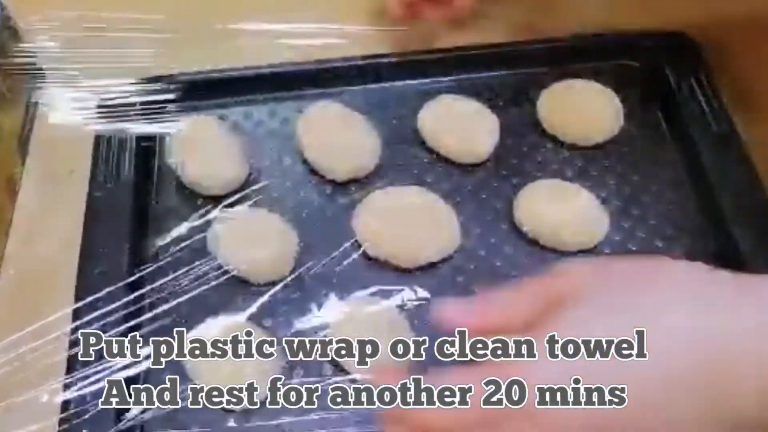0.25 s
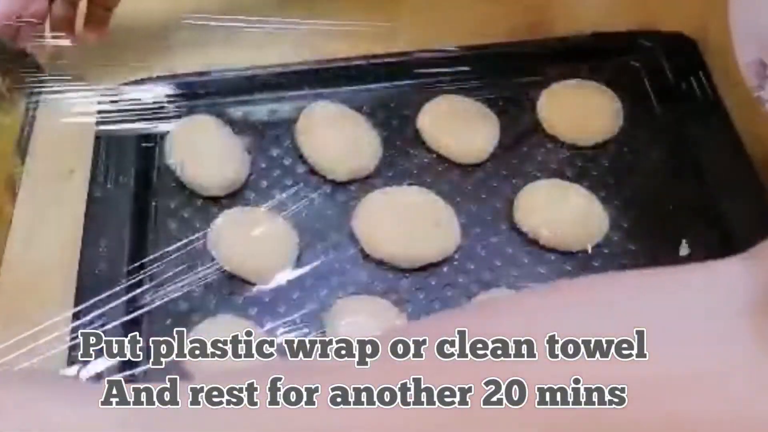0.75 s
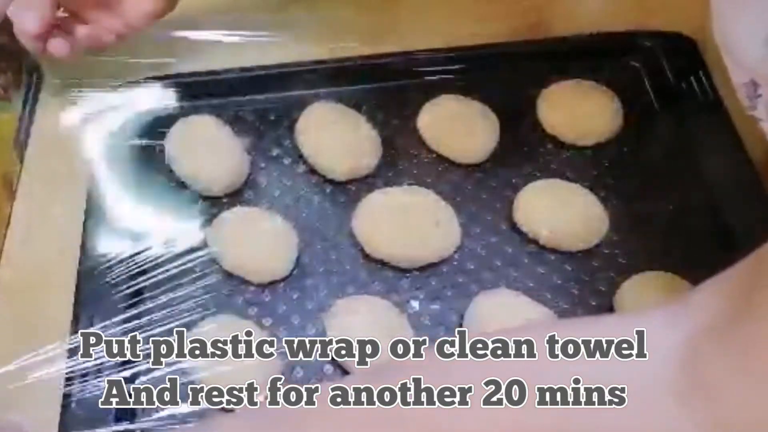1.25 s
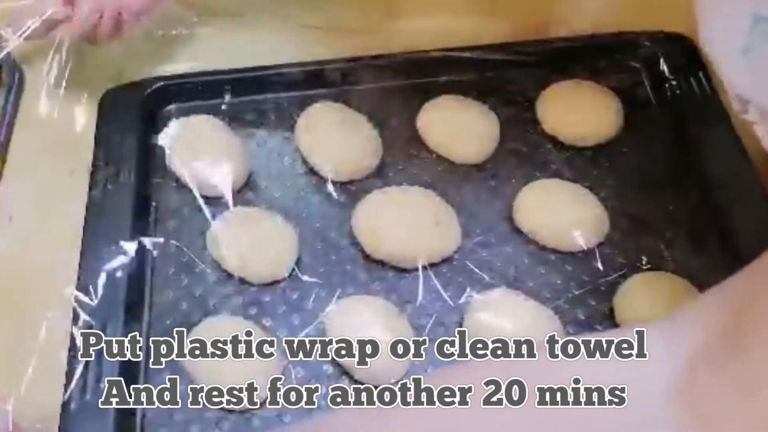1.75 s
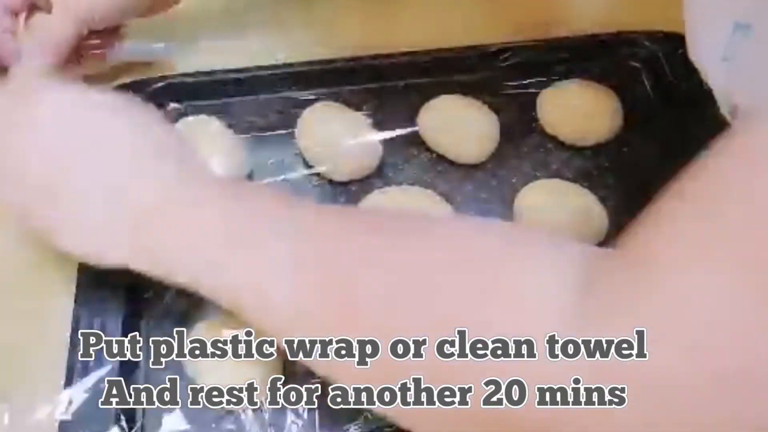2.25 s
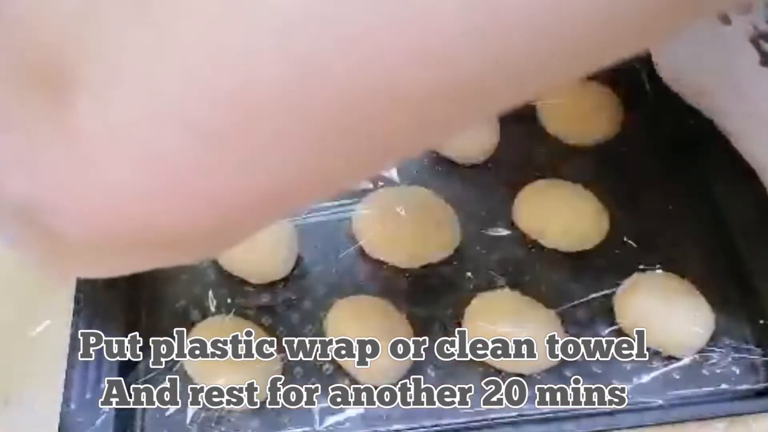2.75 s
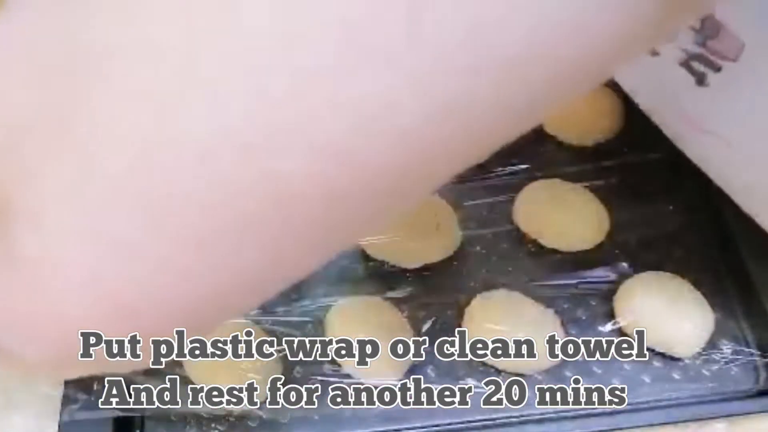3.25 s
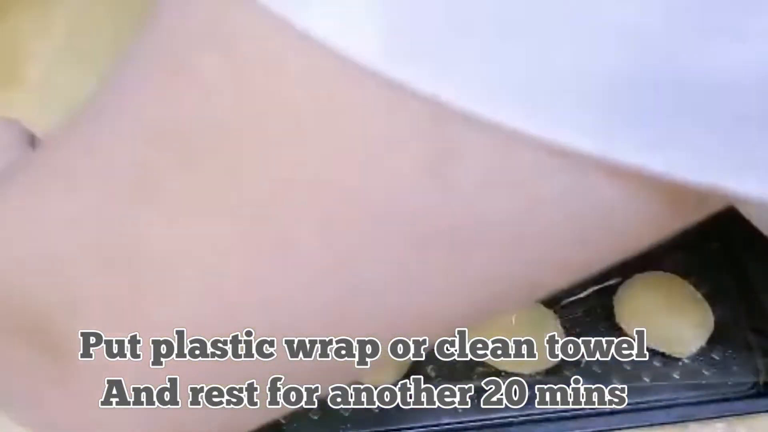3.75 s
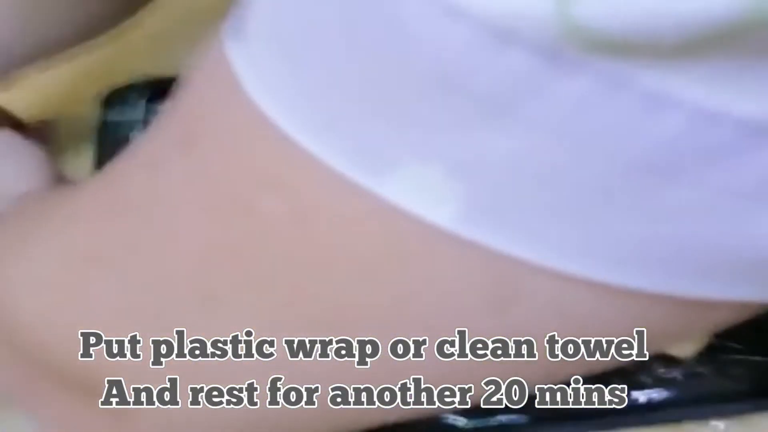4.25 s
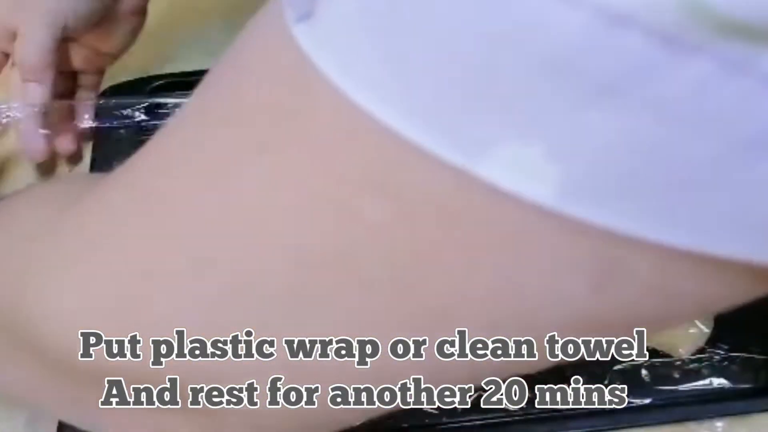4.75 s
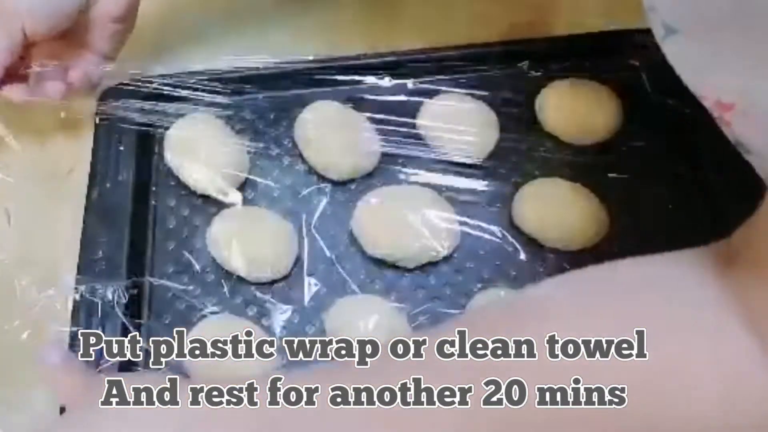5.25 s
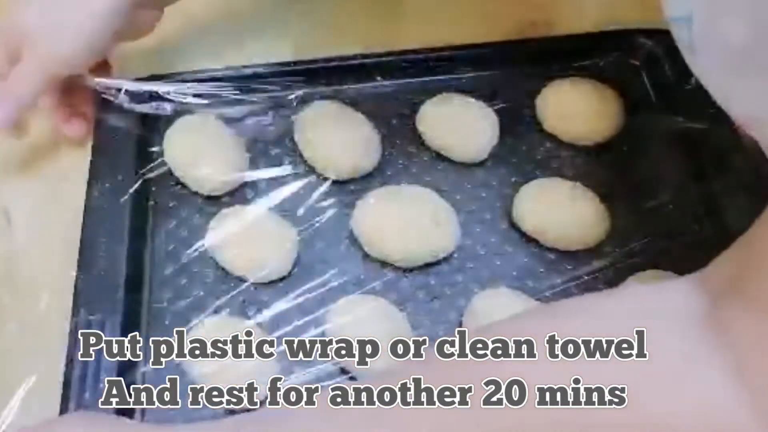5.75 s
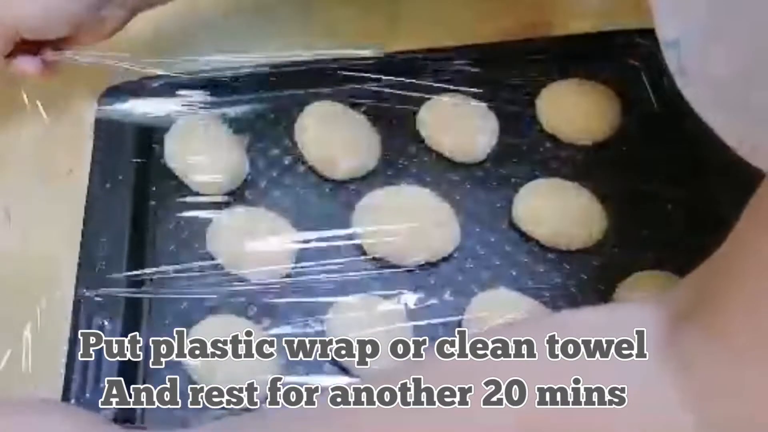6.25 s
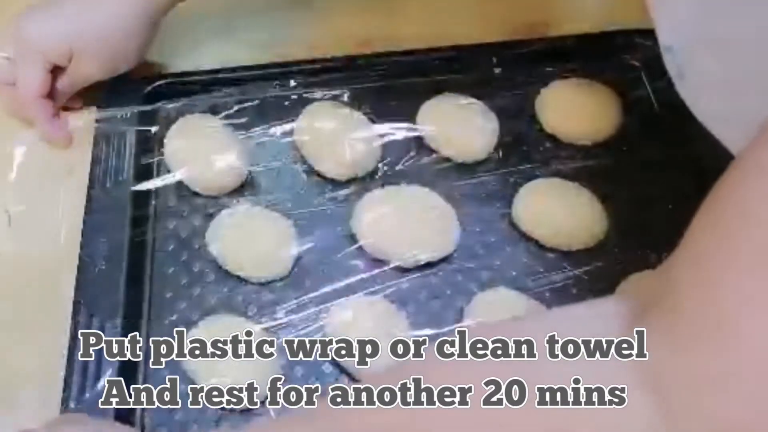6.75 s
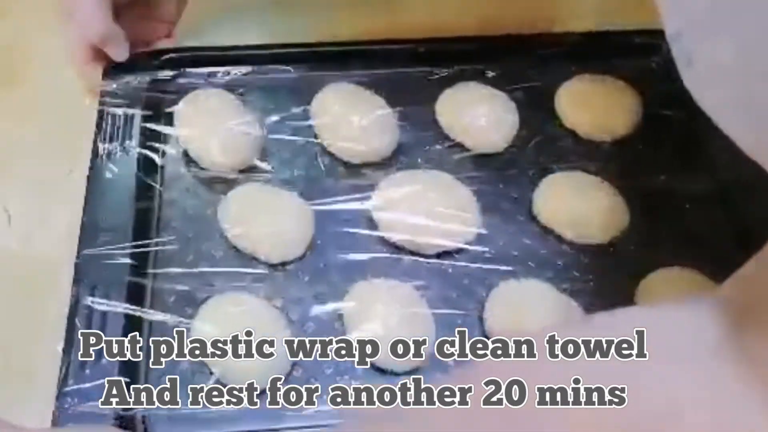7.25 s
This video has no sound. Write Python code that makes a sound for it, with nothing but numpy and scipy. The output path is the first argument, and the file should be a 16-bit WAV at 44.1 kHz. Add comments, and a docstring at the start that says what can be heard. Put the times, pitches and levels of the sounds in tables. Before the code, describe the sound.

Plastic wrap crackles in uneven pulls close to the microphone, with thin squeaks and crisp snaps, as it is drawn over a metal tray. The tray slides briefly and bumps on a wooden counter. The crackling grows busier, then two heavy thumps shake the counter and rattle the tray, and softer crinkling follows. An appliance hums low throughout in the small, slightly echoing kitchen.

```python
"""An appliance hums throughout in a small, hard-walled kitchen. From the start, cling film is pulled over
a metal tray of dough close to the microphone: it crinkles as it buckles, then squeaks softly by stick-slip
and snaps at single creases. The tray scrapes on the wooden counter and, from 1.5 s, is lightly knocked.
At 4.1 s and 4.3 s two heavy thumps set the counter ringing and the tray bouncing and clattering.
Crinkles, squeaks, snaps and a few scrapes and knocks go on to the end."""
import sys
import numpy as np
from scipy import signal
from scipy.fft import rfft, irfft
from scipy.io import wavfile

SR = 44100
rng = np.random.default_rng(int(sys.argv[2]) if len(sys.argv) > 2 else 0)


def waveform_to_disk(signal):
    """Save audio, clipped to [-1, 1], as 16-bit WAV at the path in sys.argv[1]."""
    frames = np.transpose(np.atleast_2d(signal))
    scaled = np.clip(frames, -1, 1) * 32767
    samples = np.round(scaled).astype(np.int16)
    wavfile.write(sys.argv[1], SR, samples)


N = 331146
T = np.arange(N) / SR


def amp(db):
    """Amplitude ratio of a level in decibels."""
    return 10 ** (np.asarray(db) / 20)


def unit(x):
    """Normalisation to rms 1."""
    return x / np.sqrt(np.mean(x ** 2) + 1e-20)


def read(points, hz):
    """Interpolation of a table over log frequency."""
    f, value = np.transpose(points)
    return np.interp(np.log(hz + 1), np.log(f + 1), value)


def add(mix, s, sound):
    """Superposition: a sound joins the mix at s seconds."""
    part = mix[max(round(s * SR), 0):][:len(sound)]
    part += sound[:len(part)]


def colour(x, spectrum, tilt_db=0, size=4096):
    """Minimum-phase filtering at energy 1, with the spectrum tilted by tilt_db per octave."""
    hz = abs(np.fft.fftfreq(size, 1 / SR))
    gain = amp(read(spectrum, hz) + tilt_db * np.log2(np.maximum(hz, 100) / 1000))
    log_gain = np.log(np.maximum(gain / gain.max(), 1e-5))
    response = np.fft.ifft(np.exp(np.conj(signal.hilbert(log_gain)))).real[:size // 2]
    return signal.oaconvolve(x, response / np.linalg.norm(response))[:len(x)]


def drift(rate_hz):
    """Low-pass Gaussian noise: a random fluctuation of rms 1."""
    hz = np.fft.rfftfreq(N, 1 / SR)
    return unit(irfft(rfft(rng.standard_normal(N)) * np.exp(-(hz / rate_hz) ** 2), N))


def clicks(count, per_s, spread_db):
    """A Poisson process of impulses, many small and a few large."""
    size = amp(spread_db * np.minimum(rng.exponential(1, count), 3.5))
    return size * rng.choice([-1, 1], count) * (rng.random(count) < per_s / SR)


def burst(decay_s, count=2048):
    """Exponential decay of noise that starts near rms 1."""
    fade = np.exp(-T[:count] / decay_s)
    puff = rng.standard_normal(count) * fade
    return puff * np.linalg.norm(fade) / np.linalg.norm(puff)


def flick(smear_s, count=1024):
    """Dispersion of bending waves spreads a click of energy 1: the treble arrives first."""
    hz = np.fft.rfftfreq(count, 1 / SR)
    delay = smear_s * (1 - hz / hz[-1]) ** 2 + 8 / SR
    return irfft(np.exp(-2j * np.pi * np.cumsum(delay) * hz[1]), count)


# Partials of the motor: f/Hz, level/dB
MOTOR_PARTIALS = [(43, -66.5), (104, -55), (147, -64.5), (208.8, -59), (246, -64), (418, -71.5),
                  (522.5, -63), (627, -77.5), (731, -73.5), (836, -72.5), (941, -74.5)]
# Spectrum of the room's soft rush: f/Hz, level/dB
RUSH_SPECTRUM = [(13, -20), (22, 7), (70, -6), (97, -4.5), (128, -7), (211, -5), (347, -13.5), (524, -14),
                 (585, -14.5), (1130, -19.5), (1490, -27.5), (2740, -27.5), (3610, -34), (7000, -33.5),
                 (16000, -48)]
# Change in the room noise, partly screened by the cook's body: t/s, level/dB
SCREENING = [(0, 1), (0.7, 1.05), (2.4, 0.67), (3.8, -0.5), (4.8, -1), (6, -1.5), (7.5, -1)]


def appliance(rush_db=-50, waver_db=2, wander=0.00289):
    """Acoustic shadowing: a motor wavers over the room's rush, and its higher tones are screened more."""
    screen_db = np.interp(T, *np.transpose(SCREENING))
    turns = np.cumsum(1 + wander * drift(rate_hz=4.18)) / SR
    hum = np.zeros(N)
    for hz, db in MOTOR_PARTIALS:
        rms = amp(db + waver_db * drift(rate_hz=4.2) + screen_db * min(hz / 220, 2.5))
        hum += rms * np.sqrt(2) * np.sin(2 * np.pi * (hz * turns + rng.random()))
    return hum + amp(rush_db + screen_db) * colour(rng.standard_normal(N), RUSH_SPECTRUM, size=16384)


# Spectrum of the crinkling film: f/Hz, level/dB
FILM_SPECTRUM = [(900, -31), (1500, -13), (2000, -17.5), (2600, -5.5), (3700, -12), (4300, -5.5),
                 (7000, -6), (8700, 0), (11000, -13), (15200, -16.5), (16300, -35)]
# Pulls and presses on the film: t/s, duration/s, relative level/dB, tilt/(dB per octave)
FILM_PULLS = [(0.003, 0.04, -58.5, -1.5), (0.222, .32, -69, -3), (0.74, .1, -52, -5),
              (0.971, 0.35, -61.5, -7.5), (1.309, 0.22, -51.5, -4.5), (1.743, 0.26, -64, -2.5),
              (2.174, 0.065, -61, 0), (2.461, 0.33, -59.5, -7), (2.782, 0.018, -39.5, -3.5),
              (2.799, .15, -43, -2), (2.952, 0.357, -58, 1), (3.252, 0.098, -50, -2),
              (3.336, 0.14, -44.5, 0), (3.481, .16, -49.5, .5), (3.647, 0.027, -40.5, 1.5),
              (4.093, 0.126, -54.5, 3.5), (4.227, 0.15, -45.5, 0), (4.863, 0.083, -55.5, 5),
              (5.302, 0.13, -61, -2), (5.782, 0.287, -57, 1), (6.509, .005, -50, 1),
              (6.66, 0.055, -60.5, 4), (6.773, 0.054, -50.5, 3), (6.914, 0.67, -67, -3.5),
              (7.367, 0.055, -58.5, -4)]


def crinkle(gain_db=-1, relax_db=2, ref_s=0.082, ref_db=-52):
    """Buckling: each pull forms clumps of tiny creases over the friction hiss of film on film."""
    out = np.zeros(N)
    clumps = amp(3 * drift(rate_hz=130))
    for s, length, db, tilt_db in FILM_PULLS:
        count = int(length * SR)
        # Quicker and harder pulls crease more densely; gentler ones have a larger share of hiss.
        per_s = 1050 * (ref_s / length) ** 0.43 * amp(db - ref_db) ** 0.47
        creases = unit(clicks(count, per_s, spread_db=4.5))
        hiss = amp(-4 + 0.29 * (ref_db - db)) * rng.standard_normal(count)
        sheet = unit((creases + hiss) * np.roll(clumps, -int(s * SR))[:count])
        pull = signal.windows.tukey(count, .25) * amp(relax_db * np.linspace(.5, -.5, count))
        add(out, s, amp(db + gain_db) * colour(np.pad(sheet * pull, (0, 2048)), FILM_SPECTRUM, tilt_db))
    return signal.oaconvolve(out, flick(smear_s=0.000762))[:N]


# Short squeaks of the film and a brief bright scrape of the tray: t/s, duration/s, f/Hz, relative level/dB
FRICTION_SQUEAKS = [(0.596, 0.24, 3065, -54), (0.729, .04, 2280, -48), (0.772, 0.02, 8530, -35.5),
                    (1.018, 0.1804, 2830, -57), (1.101, 0.24, 4150, -52), (1.156, 0.19, 6437, -52),
                    (2.774, 0.02, 2590, -34.5), (4.738, .14, 2970, -62), (5.425, 0.23, 4852, -54.5),
                    (5.983, .21, 6100, -58), (5.98, .17, 3134, -62.5), (7.382, .18, 6460, -60),
                    (7.397, 0.15, 3180, -60.5)]


def squeaks(gain_db=-2, glide=0.0495):
    """Irregular stick-slip drives one rising resonance: tightening film squeaks, or the tray scrapes."""
    out = np.zeros(N)
    grip = amp(2.1 * drift(rate_hz=57))  # the surfaces hold and let go unevenly
    for s, length, hz, db in FRICTION_SQUEAKS:
        count = int(length * SR)
        # Higher and briefer squeaks fill a wider band.
        width_hz = min(370 * (hz / 3000) ** 2.34, 1400) * (0.2 / length) ** 0.35
        band = np.exp(-2 * (np.fft.fftfreq(count, 1 / SR) / width_hz) ** 2)
        slips = np.fft.ifft(band * np.exp(2j * np.pi * rng.random(count)))
        turns = np.cumsum(hz * (1 + glide * np.linspace(-.5, .5, count))) / SR
        tone = unit((slips * np.exp(2j * np.pi * turns)).real)
        rasp = unit(np.roll(grip, -int(s * SR))[:count])
        add(out, s, amp(db + gain_db) * tone * rasp * np.hanning(count))
    return out


# Spectra of a snap's body and of its sharp leading edge: f/Hz, level/dB
BODY_SPECTRUM = [(300, -4), (1500, 2), (2600, -3.5), (3600, -5), (5000, -7.5), (9000, -0.5), (10500, -7),
                 (13000, -15.5)]
EDGE_SPECTRUM = [(7000, -33.5), (10500, -2), (13500, -9), (15300, -15), (16200, -21)]
# The loudest creases, which flip singly: t/s, relative level/dB, centre f/Hz, edge level/dB re body
CREASE_FLIPS = [(0.7213, -38, 5150, -4), (1.077, -48, 2870, -5), (1.312, -35.5, 3550, -19),
                (1.3456, -31, 6870, -7), (1.4899, -27, 6150, -6.5), (1.546, -29, 3130, -11),
                (1.8795, -47, 6660, -26), (2.6888, -40.5, 8850, -12.5), (2.7378, -30, 9080, -2),
                (2.7685, -30, 2640, -4), (2.805, -26.5, 6740, -13), (2.8127, -22.5, 9260, -14),
                (3.0702, -31, 8750, -9), (3.2495, -32, 6560, -3), (3.323, -34.5, 8830, 0.5),
                (3.4514, -28, 8200, -9.5), (3.6572, -25, 8670, -2), (3.679, -27, 8060, -6),
                (4.129, -27.5, 8760, -27), (4.2372, -26, 8540, -6), (4.6875, -45, 7400, -8),
                (5.8995, -43, 8340, -9.5), (5.974, -43.5, 8440, 0), (6.134, -43.5, 5780, -3),
                (6.357, -47, 8450, -5), (6.5134, -28, 5250, -2), (6.7524, -40, 4220, -12)]


def snaps(gain_db=14, flutter_db=-19, q=8000 / 5500):
    """Snap-through: a crease flips, flutters and rings a patch of film; large, low patches ring longer."""
    out = np.zeros(N)
    for s, db, hz, edge_db in CREASE_FLIPS:
        crack = flick(smear_s=.0018) + amp(flutter_db) * burst(decay_s=0.0028, count=1024)
        patch = signal.lfilter(*signal.iirpeak(hz, q, SR), crack)
        body = unit(colour(patch, BODY_SPECTRUM))
        edge = unit(colour(crack, EDGE_SPECTRUM))
        snap = body + amp(edge_db) * edge
        add(out, s, amp(db + gain_db) * snap / np.linalg.norm(snap))
    return out


# Spectrum of metal rubbing on wood: f/Hz, level/dB
SCRAPE_SPECTRUM = [(100, -20), (180, -4), (250, 3.5), (450, -0.5), (640, -1.5), (820, -2.5), (1080, -1),
                   (1400, -8.5), (1800, -8.5), (2700, -10), (3700, -19), (7000, -23), (10000, -35.5)]
# Short slides of the tray: t/s, duration/s, relative level/dB, tilt/(dB per octave)
TRAY_SLIDES = [(.744, 0.062, -50.5, 1), (1.272, 0.089, -52, 0.5), (1.425, 0.18, -44, -3),
               (1.893, 0.057, -72.5, -2.5), (2.798, .14, -35, .5), (2.958, 0.197, -55, 6.5),
               (3.343, .13, -53, 15.5), (4.873, 0.13, -51, 4), (6.784, 0.026, -46.5, 6),
               (7.356, 0.079, -52, -3)]


def scrapes(gain_db=-1):
    """Dry friction: the tray's base catches and slips on the counter, hardest early in a slide."""
    out = np.zeros(N)
    for s, length, db, tilt_db in TRAY_SLIDES:
        count = int(length * SR)
        slips = unit(clicks(count, per_s=2500, spread_db=3.5))
        stroke = signal.windows.tukey(count, .3) * amp(np.linspace(2, -4, count))
        scrape = colour(np.pad(slips * stroke, (0, 2048)), SCRAPE_SPECTRUM, tilt_db)
        add(out, s, amp(db + gain_db) * scrape)
    return out


def ring(modes, t):
    """Free vibration as a sum of damped normal modes."""
    return -sum(amp(db - 60 * t / t60) * np.sin(2 * np.pi * hz * t) for hz, db, t60 in modes)


# Modes of the wooden counter and of the metal tray: f/Hz, level/dB, T60/s
COUNTER_MODES = [(42.3, 6.5, 0.2), (133.8, -3.5, 0.59), (165.2, -5.5, 0.25), (206.4, 1, 0.2),
                 (240, -1.5, 0.39), (275.4, -0.5, 0.36), (333, 0, 0.18), (425, -20.5, 0.3),
                 (546, -10, 0.41), (616, -13.5, 0.424), (694, -15, 0.25), (818, -16, 0.3)]
TRAY_MODES = [(1050, -5, 0.36), (1286, -7, 0.21), (1490, -7, 0.42), (1712, -6.5, 0.27), (2020, -5, 0.18),
              (2310, -17, 0.25), (2380, -8.5, 0.21), (2480, -5, 0.222), (2560, -24, 0.26),
              (2670, -10, 0.25), (3000, -33, 0.3)]
# Spectrum of loose sheet metal: f/Hz, level/dB
CLATTER_SPECTRUM = [(240, -68), (400, 8), (448, -1.5), (488, -2.5), (727, -2.5), (1100, -7), (1200, -7),
                    (1680, -12), (2180, -11), (2580, -11), (3480, -20), (8290, -30), (12000, -81),
                    (15600, -103), (22000, -120)]
# Light knocks on the tray, and the short tok of the first thump:
# t/s, thud level/dB, thud f/Hz, relative clatter level/dB
SHORT_KNOCKS = [(1.479, -30, 310, -33.5), (1.547, -26, 419, -35), (1.879, -32.5, 280.5, -30.5),
                (2.554, -33.5, 108, -39), (2.628, -36.5, 218, -51.5), (2.785, -32.5, 323, -25),
                (2.931, -36.5, 40.8, -50), (4.1105, -19.5, 958, -25), (4.88, -35, 187, -34),
                (4.908, -52, 170, -42), (6.795, -36.5, 225, -38)]
# Heavy thumps on the counter: t/s, thud level/dB, thud f/Hz, swell/s, counter ring level/dB,
# relative clatter level/dB, tray ring level/dB, bounce interval/s, number of bounces
COUNTER_THUMPS = [(4.1085, -3.5, 270.6, 0.005, -17.5, -24.5, -44, .0235, 4),
                  (4.3299, 0.5, 209.2, 0.0018, -16, -12.5, -26.5, .0122, 3)]


def knocks(swell_cycles=1.03, rebound_db=-12.5, bounce_loss_db=1.5, loosen_db=0.98):
    """Impact excitation: blows thud, clatter and ring counter and tray; thumps make the tray bounce."""
    thuds, rings, chatter = np.zeros((3, N))
    t = T[:SR]
    counter, tray = ring(COUNTER_MODES, t), ring(TRAY_MODES, t)
    build_up = 1 - np.exp(-t / 0.0042)

    def strike(s, thud_db, hz, swell_s, clatter_db):
        """A transient contact force: a short push on the wood and a rattle of loose metal."""
        push = (t / swell_s * np.exp(1 - t / swell_s)) ** 2
        add(thuds, s, -amp(thud_db) * push * np.sin(2 * np.pi * hz * t))
        add(chatter, s, amp(clatter_db) * burst(decay_s=0.0031))

    for s, db, hz, clatter_db in SHORT_KNOCKS:
        strike(s, db, hz, swell_cycles / hz, clatter_db)
        add(rings, s, build_up * (amp(db - 17.5) * counter + amp(clatter_db - 21) * tray))
    for s, db, hz, swell_s, counter_db, clatter_db, tray_db, gap, bounces in COUNTER_THUMPS:
        strike(s, db, hz, swell_s, clatter_db)
        add(rings, s, build_up * (amp(counter_db) * counter + amp(tray_db) * tray))
        for k in range(1, round(bounces) + 1):
            # Each bounce lands on another corner, so its pitch scatters.
            corner_hz = 299 * 2 ** (.7 * rng.uniform(-0.79, 1))
            bounce_db = db + rebound_db - k * bounce_loss_db
            strike(s + k * gap, bounce_db, corner_hz, swell_cycles / corner_hz, clatter_db + k * loosen_db)
    return thuds, rings, amp(-7) * colour(chatter, CLATTER_SPECTRUM)


# Reverberation time of the kitchen: f/Hz, T60/s
KITCHEN_T60 = [(100, 0.34), (400, 0.38), (1200, 0.5), (2800, 0.68), (6000, 0.53), (10000, 0.4),
               (15000, 0.31)]


def kitchen(x, first_s=0.0075, echoes_per_s=4000):
    """Reverberation: sparse reflections from hard walls, each band decaying at its own rate."""
    echoes = rng.choice([-1, 1], SR) * (rng.random(SR) < echoes_per_s / SR) * (T[:SR] > first_s)
    hz, t, bands = signal.stft(echoes, SR, nperseg=256)
    decay = amp(-60 * t / read(KITCHEN_T60, hz)[:, None])
    tail = signal.istft(bands * decay, SR, nperseg=256)[1]
    reference = np.linalg.norm(echoes * amp(-60 * T[:SR] / .5))  # a tail with a T60 of 0.5 s
    return signal.oaconvolve(x, tail / reference)[:N]


def scene():
    """Superposition of the hum, the direct sound of film, tray and counter, and the reverberant field."""
    hum, film, squeak, cracks, slide = appliance(), crinkle(), amp(-1) * squeaks(), snaps(), scrapes()
    thuds, rings, clatter = knocks()
    direct = film + squeak + cracks + slide + thuds + rings + clatter
    to_room = amp(-6) * film + squeak + amp(-4) * cracks + amp(-5) * slide + amp(-4.5) * thuds + clatter
    return (hum + direct + kitchen(to_room))[None]


def record(dry, low_hz=33, high_hz=15800):
    """Band limiting: the microphone loses the deepest bass, and a low-pass cuts the highest treble."""
    thinned = signal.sosfilt(signal.butter(3, low_hz, "high", fs=SR, output="sos"), dry)
    low_pass = signal.firwin(301, high_hz, window=("kaiser", 9), fs=SR)
    return signal.oaconvolve(thinned, low_pass[None], "same")


dry = scene()
out = record(dry)
waveform_to_disk(out)
```